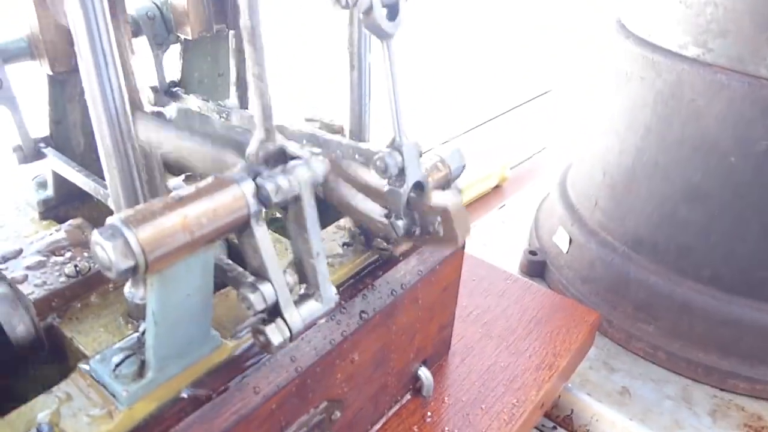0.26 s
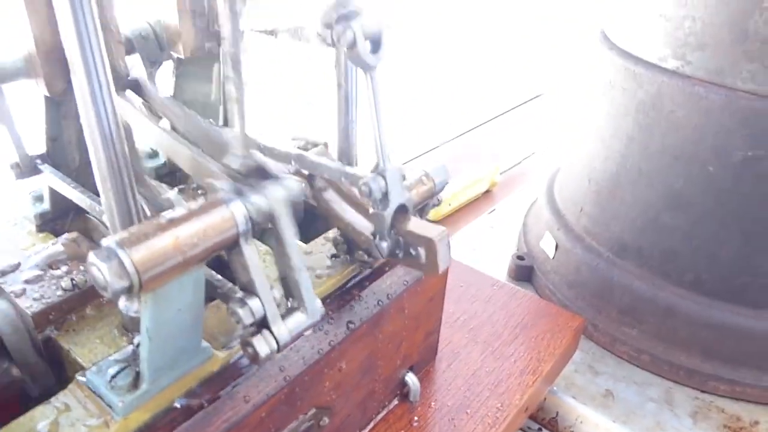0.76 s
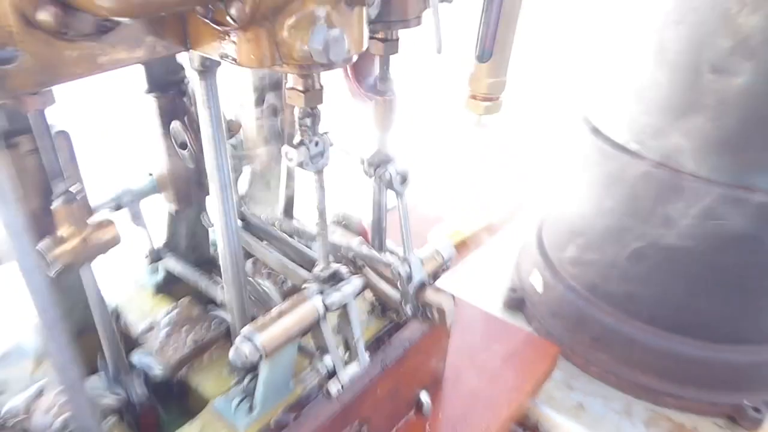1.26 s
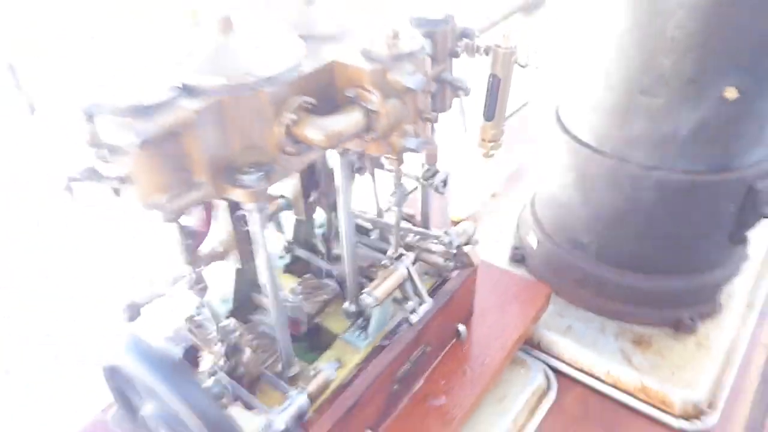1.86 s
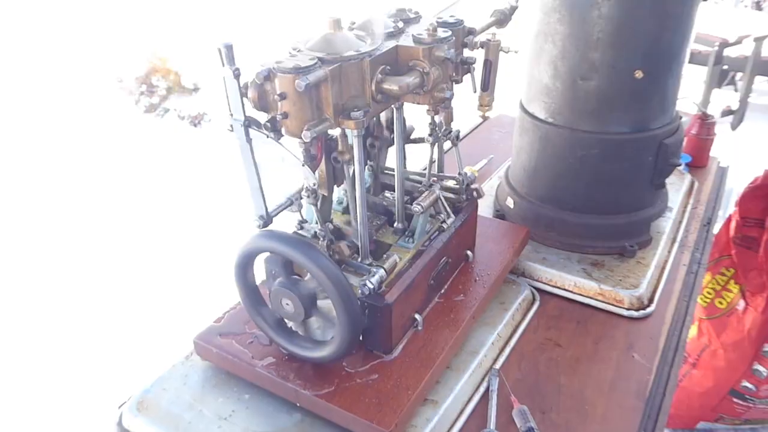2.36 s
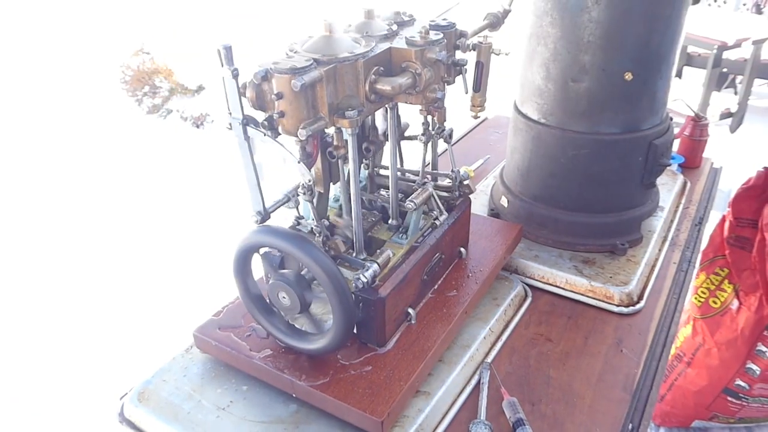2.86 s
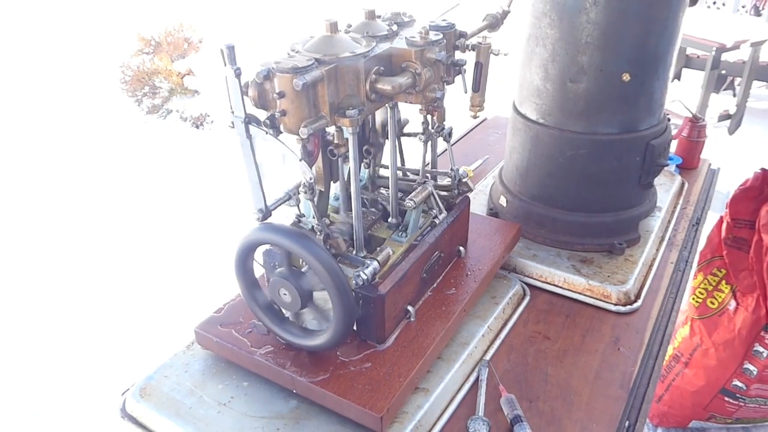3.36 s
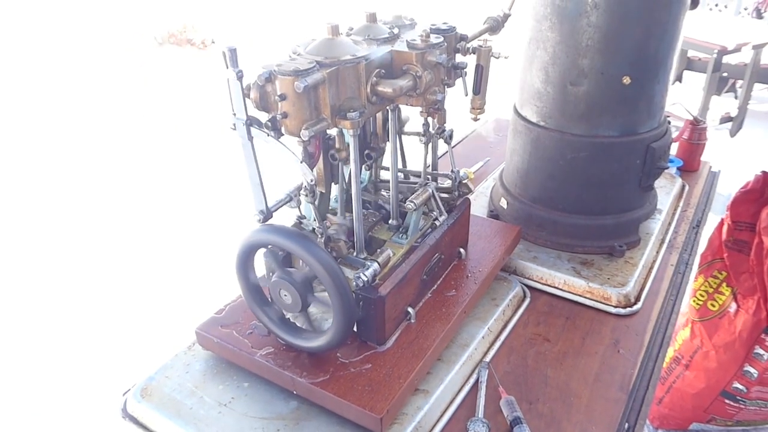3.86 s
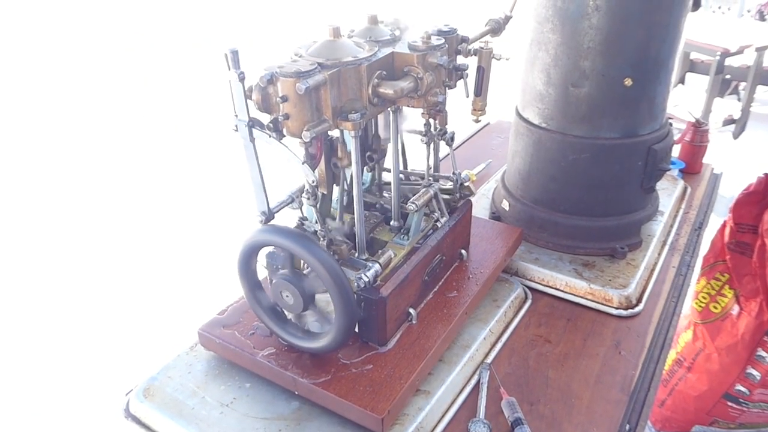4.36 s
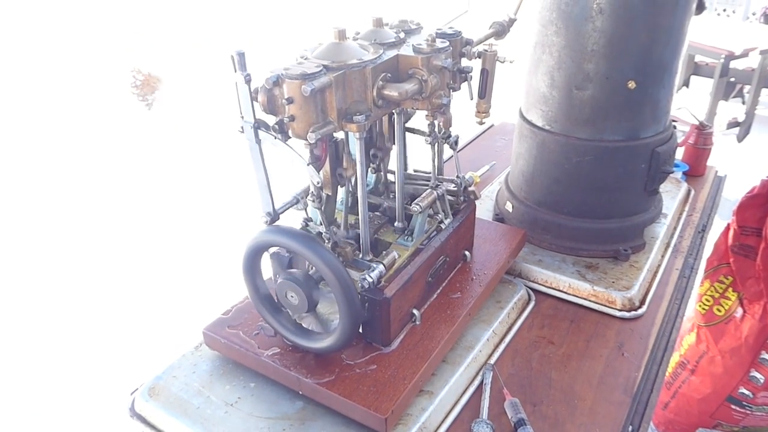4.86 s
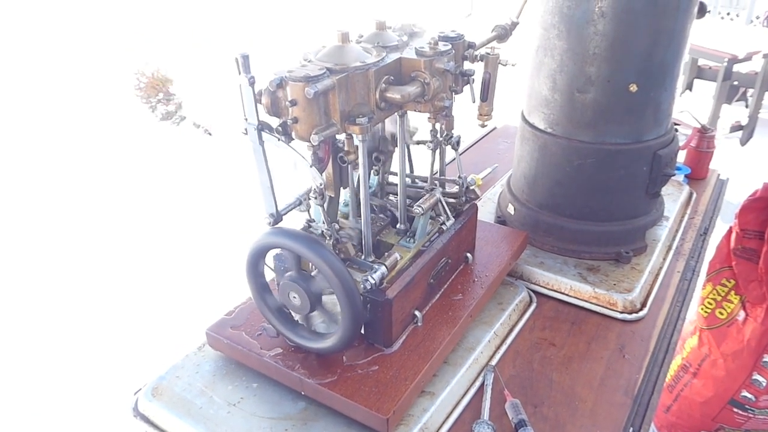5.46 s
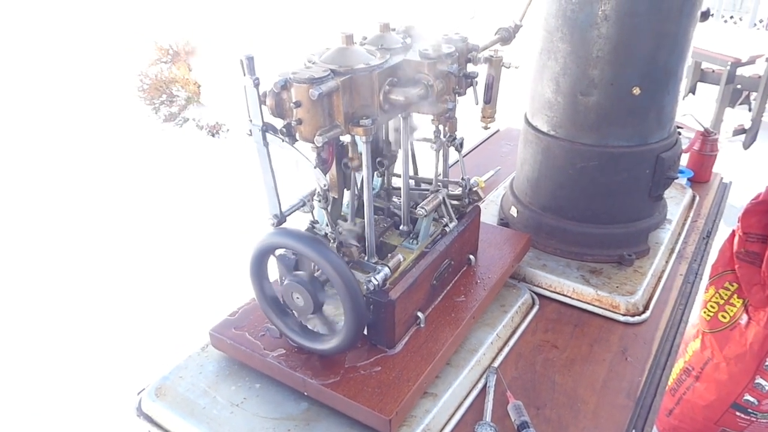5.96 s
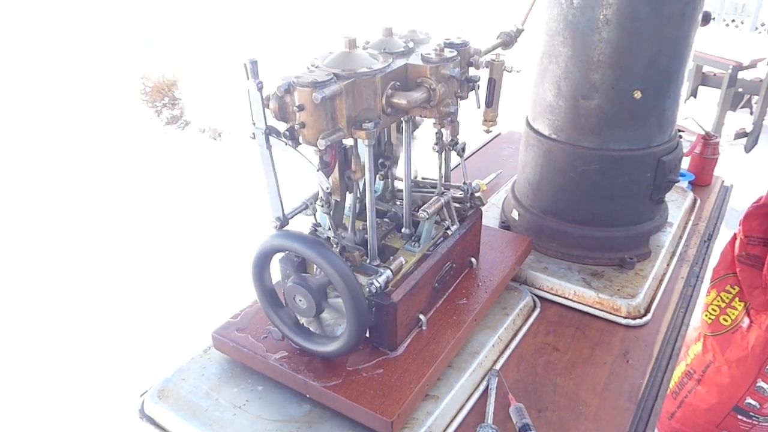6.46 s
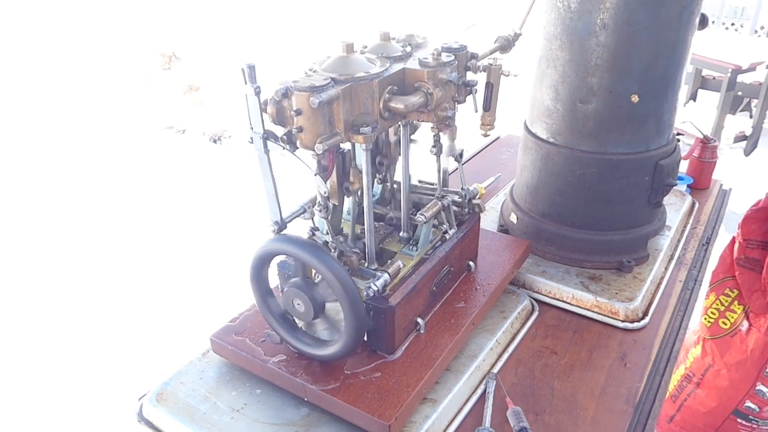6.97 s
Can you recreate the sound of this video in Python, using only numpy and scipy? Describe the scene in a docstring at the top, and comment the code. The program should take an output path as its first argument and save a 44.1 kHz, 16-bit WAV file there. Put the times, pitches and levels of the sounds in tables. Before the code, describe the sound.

Outdoors, a small steam engine is heard close up. A brief hiss and handling clicks lead in, then from about 0.2 s it chuffs rapidly, two unequal puffs per turn, nearly four turns a second. Each puff has a hollow pipe boom and a sharp breathy jet with faint whistling; between puffs come short metallic valve-gear clacks and soft bed thumps over steady leaking steam and low rumble. Left leans a little stronger in the midrange. Camera ticks and dull knocks increase from 1.9 s. At 2.4 s everything cuts to silence until about 2.66 s. The engine returns more distant, thinner and hissier, exhaust briefly weak, under dense crackling clicks until about 3.3 s, with a strong one near 2.96 s. Scattered ticks and knocks continue to 4.8 s, including a sharp one at 4.5 s. Afterwards the even chuffing continues almost undisturbed, somewhat stronger, to the end around 7.2 s.

```python
"""Small steam engine outdoors

A model steam engine gives two unequal exhaust chuffs a crank turn, with whistles, bed thumps and valve-gear clacks.
Steam leaks steadily. The hand-held camera backs away, its body ticks and knocks, and the sound drops out once.
Resonances colour noise for steam, rumble and gear; crank position times the strokes; clicks ring the body."""
import sys
import numpy as np
from scipy import signal
from scipy.io import wavfile
from scipy.ndimage import uniform_filter1d

SR = 44100
rng = np.random.default_rng(int(sys.argv[2]) if len(sys.argv) > 2 else 0)


def waveform_to_disk(signal):
    """Save audio, clipped to [-1, 1], as 16-bit WAV at the path in sys.argv[1]."""
    frames = np.transpose(np.atleast_2d(signal))
    scaled = np.clip(frames, -1, 1) * 32767
    samples = np.round(scaled).astype(np.int16)
    wavfile.write(sys.argv[1], SR, samples)


def field_ratio(decibels):
    """Amplitude ratio for a level in dB (20 dB per decade); scalars and array-likes work."""
    return 10 ** (np.asarray(decibels, dtype=float) / 20)


N = 317961

# crankshaft position, fastest early on, then settling a little slower: time_s, turns_made
CRANK = [(.18, 0), (.447, 1), (.588, 1.52), (0.732, 2), (1.697, 6), (2.185, 8), (3.199, 12), (3.707, 14),
         (4.249, 16), (5.031, 19), (6.094, 23), (7.145, 27), (7.41, 28)]
STEAM_REFERENCE_DB = -26    # exhaust level at which whistles, thumps and gear have their own levels


def rms_one(x):
    """Scale to rms 1."""
    return x / np.sqrt(np.mean(x ** 2) + 1e-20)


def in_time(rows):
    """Columns joined by straight lines, one value a sample."""
    s, *columns = np.transpose(rows)
    return [np.interp(np.arange(N) / SR, s, column) for column in columns]


def drift(rate_hz):
    """Slow chance of spread 1: white noise smoothed twice."""
    r = np.exp(-2 * np.pi * rate_hz / SR)
    return rms_one(signal.lfilter([1], [1, -2 * r, r * r], rng.standard_normal(N)))


def resonance(x, hz, width_hz):
    """Two-pole peak of gain 1."""
    r = np.exp(-np.pi * width_hz / SR)
    poles = [1, -2 * r * np.cos(2 * np.pi * hz / SR), r * r]
    return signal.lfilter(np.array([1, 0, -1]) * (1 - r * r) / 2, poles, x)


def coloured_noise(modes, near, alike, patchy_db, skirt):
    """Stereo noise in parallel resonances that follow the nearness and waver; half-second rms held at 1."""
    mid, side = rng.standard_normal((2, N))
    # alike is the correlation of left and right
    white = np.sqrt(1 + alike) * mid + np.sqrt(1 - alike) * side * [[1], [-1]]
    out = 0
    for k, (hz, width_hz, near_db, far_db) in enumerate(modes):
        # a wider second pass darkens the valleys
        peak = resonance(resonance(white, hz, width_hz), hz, skirt * width_hz)
        level_db = far_db + near * (near_db - far_db) + patchy_db * drift(13.9)
        out = out + (-1) ** k * field_ratio(level_db) * peak
    return out / np.sqrt(uniform_filter1d(np.mean(out ** 2, axis=0), size=SR // 2))


def steam_leak(leak_db, near):
    """Escaping steam hisses steadily, with small gusts in its level."""
    # hiss resonances: pitch_hz, width_hz, near_db, far_db (relative)
    leak_modes = [(2700, 1060, -8, -3), (5000, 3900, -5.5, -7.5), (6900, 1130, 7, 0.5),
                  (9100, 890, -6, 5.5), (10340, 700, 6, 5), (11530, 1400, -9.5, -3),
                  (13800, 1800, -48.5, -23)]
    gusts = field_ratio(leak_db + 1.6 * drift(12))
    return gusts * coloured_noise(leak_modes, near, alike=0.38, patchy_db=2.0, skirt=2.9)


def broad_rumble(ticks_per_s, near):
    """Wavering low and middle noise, louder while the camera ticks more, softer before the engine turns."""
    # rumble resonances: pitch_hz, width_hz, near_db, far_db (relative)
    rumble_modes = [(103, 54, -2.5, -6), (162, 66, -3, -0.5), (279, 136, 2, -2), (560, 220, 0, -3.5),
                    (930, 445, -3, -5.5), (1990, 2000, -14, -9.5)]
    idle = np.arange(N) / SR < CRANK[0][0]
    # -39 dB at 30 ticks per s, 3.5 dB more for ten times as many
    rumble_db = -39 + 3.5 * np.log10(np.maximum(ticks_per_s, 1) / 30) - 3 * idle
    shakes = field_ratio(rumble_db + 1.6 * drift(15))
    return shakes * coloured_noise(rumble_modes, near, alike=.92, patchy_db=3.5, skirt=3.7)


def handling_rumble(ticks_per_s):
    """Lumpy low noise, its own at each microphone, stronger the more the camera is handled."""
    lumps = field_ratio(-74 + 2.3 * np.array([drift(6.), drift(6.)])) * np.sqrt(np.maximum(ticks_per_s, 1))
    low_pass = signal.butter(2, 50., fs=SR, output="sos")
    return lumps * rms_one(signal.sosfilt(low_pass, rng.standard_normal((2, N))))


def ring(clicks, hz, t60):
    """A unit click sets a sine of height 1 ringing, 60 dB down after t60 seconds."""
    r, w = field_ratio(-60 / (t60 * SR)), 2 * np.pi * hz / SR
    return signal.lfilter([0, np.sin(w)], [1, -2 * r * np.cos(w), r * r], clicks + 1e-18)


def camera_ticks(ticks_per_s):
    """Each tick is a slip of a millisecond or two that reaches every body mode with its own strength and moment."""
    # clear ticks: time_s, level_db (relative), dull_against_bright_db
    ticks = [(0.148, -13, -2.5), (0.173, -8, -3), (0.1942, -1.5, -16.5), (0.262, -15.5, 1),
             (0.307, -14.5, 5), (0.3524, -12.5, -2), (0.3704, -7, 11.5), (0.7774, -13, -15),
             (1.0202, -13, -15), (1.1497, -10.5, -4), (1.4031, -10.5, 10), (1.5838, -12, -2),
             (1.6185, -7, 0), (1.911, -7, 4), (1.9506, -3, -1), (1.9925, -5, 3), (2.067, -10, 1.5),
             (2.072, -11, -16), (2.1484, -8, 5), (2.3034, -10, -2.5), (2.3219, -9.5, 10),
             (2.3384, -7.5, 6.5), (2.3477, -8, 5), (2.6729, -9.5, 0), (2.68, -6, -9.5), (2.6931, -5.5, 7.5),
             (2.6978, -1.5, 6), (2.7186, -11.5, -3.5), (2.7263, 0, -20), (2.7527, -9.5, -17),
             (2.8274, -0.5, -20), (2.8378, -4, 0), (2.854, 0.5, -15), (2.8802, -8.5, -7.5),
             (2.908, -11, -10), (2.921, -14, -11), (2.9528, -12, -12), (2.9618, 5.5, -18),
             (3.0054, -10, -7), (3.0488, -6, -4), (3.0595, -14, 7), (3.0741, -15, 4), (3.1211, -2, -5.5),
             (3.1443, -5, -6), (3.1538, -7.5, -5.5), (3.195, -11.5, 3.5), (3.2338, -6, -2),
             (3.2456, -11.5, -9), (3.2518, -9, -17), (3.418, -8, -1), (3.6297, -5.5, -4.5),
             (3.684, -9, -20), (3.7048, -8, -8), (3.8561, -5, 5), (3.8608, -6.5, 16), (4.0207, -3.5, -2),
             (4.132, -11.5, -5.5), (4.183, -6, -3), (4.202, -8.5, -20), (4.2204, -10, -3),
             (4.426, -14.5, -0.5), (4.5285, 2, -9), (4.6518, -16.5, 2), (4.7528, -11.5, -7.5),
             (4.7781, -16, -12), (5.3135, -13, -2.5)]
    # lower camera body modes: pitch_hz, level_db (relative), t60_s
    body_dull = [(934, -12, 0.013), (1730, -4.5, 0.0054), (2720, -1, 0.0034), (4037, -1, 0.003),
                 (4990, -3.5, 0.0029)]
    # upper camera body modes: pitch_hz, level_db (relative), t60_s
    body_bright = [(6400, -8, 0.0066), (7200, -5, 0.0037), (8910, 2.5, 0.0025), (9730, -16.5, 0.003),
                   (10490, -8.5, 0.0085), (12300, -17.5, 0.0036)]
    slip_s = .0008    # time constant of a tick's burst of micro-slips
    s, tick_db, dull_db = np.transpose(ticks)
    at, out = np.round(s * SR).astype(int), np.zeros((2, N))
    faint_db = -30.5 + 4.03 * np.minimum(rng.exponential(1, N), 3.2)
    faint = (rng.random(N) < ticks_per_s / SR) * field_ratio(faint_db)
    fade = np.exp(-np.arange(300) / (slip_s * SR))
    bright_share = 1 / (1 + field_ratio(dull_db) ** 2)
    for modes, share in ((body_dull, 1 - bright_share), (body_bright, bright_share)):
        for hz, level_db, t60 in modes:
            strength = faint.copy()
            strength[at] = field_ratio(tick_db - 3.0) * np.sqrt(share)
            where = np.flatnonzero(strength)
            strength *= field_ratio(level_db + 3.5 * rng.standard_normal(N)) * rng.choice([-1, 1], N)
            # scattered between the sides, leaning right
            sides = strength * field_ratio(0.36 * rng.standard_normal(N) * [[1], [-1]] + [[-.7], [.7]])
            late = where + (rng.exponential(.0002, N)[where] * SR).astype(int)
            clicks = np.zeros((2, N))
            clicks[:, np.minimum(late, N - 1)] = sides[:, where]
            slips = fade * rng.standard_normal(300) * (rng.random(300) < .15)
            slips = slips / np.sqrt(np.sum(slips ** 2))
            clicks = signal.fftconvolve(clicks, [slips], axes=1)[:, :N]
            out += ring(clicks, hz, t60)
    return signal.sosfilt(signal.butter(2, [500., 11500.], "band", fs=SR, output="sos"), out)


def camera_knocks():
    """A hand's soft contact rings the hollow body at its pitch and, weaker, at three overtones."""
    # dull knocks: time_s, level_db (relative), pitch_hz
    knocks = [(0.1945, -17, 510), (0.197, -21, 880), (0.913, -23.5, 448), (1.155, -22, 457),
              (1.948, -17.5, 408), (2.689, -24, 1110), (3.235, -24, 300), (3.977, -20.5, 843),
              (4.02, -20, 334), (4.181, -21, 785), (4.19, -23, 200)]
    out = np.zeros(N)
    for s, knock_db, hz in knocks:
        click = np.zeros(N)
        click[round(s * SR)] = field_ratio(knock_db)
        out += ring(click, hz, 0.058) + .9 * ring(click, 1.5 * hz, 0.038)
        out += 0.34 * ring(click, 2.2 * hz, 0.036) + 0.63 * ring(click, 2.9 * hz, 0.05)
    return signal.sosfilt(signal.butter(2, [220., 2500.], "band", fs=SR, output="sos"), out)


def every_turn(contacts, near):
    """Repeats the contacts of one turn: their times, the nearness then, and their other columns."""
    first_turn, last_turn = 1, 27
    turn = np.repeat(np.arange(first_turn, last_turn + 1), len(contacts))
    near_place, far_place, *columns = np.tile(np.transpose(contacts), last_turn + 1 - first_turn)
    crank_s, turns = np.transpose(CRANK)
    nearness = np.interp(np.interp(turn, turns, crank_s) * SR, np.arange(N), near)
    place = far_place + nearness * (near_place - far_place)
    return np.interp(turn + place, turns, crank_s), nearness, *columns


def swells(times, levels_db, rise_s, fall_s, rounded):
    """One rise and fall for every event; rounded 2 is a bell, 1 a sharp peak."""
    out, t = np.zeros(N), np.arange(-4000, 4000)
    shape = np.exp(-np.abs(t / SR / np.where(t < 0, rise_s, fall_s)) ** rounded)
    for s, level_db in zip(times, levels_db):
        at = round(s * SR) + t
        inside = (at >= 0) & (at < N)
        out[at[inside]] += field_ratio(level_db) * shape[inside]
    return out


def stroke_note(row, near, hz, width_hz, length_s):
    """Noise in one resonance that swells once a turn."""
    s, nearness, near_db, far_db = every_turn([row], near)
    level_db = far_db + nearness * (near_db - far_db) + 1.6 * rng.standard_normal(len(s))
    mid, side = rng.standard_normal((2, N))
    noise = mid + 0.26 * side * [[1], [-1]]
    tone = resonance(resonance(noise, hz, width_hz), hz, 2 * width_hz)
    return swells(s, level_db, rise_s=length_s, fall_s=length_s, rounded=1.8) * rms_one(tone)


def whistles_and_thumps(near):
    """Narrow notes in the steam, each stroke with its own, and the piston load thumping through the bed."""
    # steam notes: near_place_turns, far_place_turns, pitch_hz, near_db, far_db
    whistle_rows = [(-.17, -0.15, 7340, -39, -30.5), (-.17, -0.18, 2950, -36.5, -39.5),
                    (.25, .25, 2900, -39.5, -38.5), (.33, 0.34, 6760, -40.5, -31.5),
                    (.33, .34, 10300, -38, -29), (.33, .36, 9250, -40, -30)]
    # bed thumps: near_place_turns, far_place_turns, near_db, far_db
    thump_rows = [(-.19, -.18, -35.5, -39), (-.02, -0.058, -37, -38), (.5, .5, -37.5, -46)]
    sharpness = 22    # whistle pitch over width
    out = 0
    for near_place, far_place, hz, near_db, far_db in whistle_rows:
        row = (near_place, far_place, near_db, far_db)
        out = out + stroke_note(row, near, hz, hz / sharpness, length_s=0.028)
    for row in thump_rows:
        out = out + stroke_note(row, near, hz=170, width_hz=117, length_s=.012)
    return out


def exhaust(steam_db, near):
    """The port opens and shuts for each puff, which booms in the pipe and hisses at its mouth."""
    # chuffs: near_place_turns, far_place_turns, pipe_db (relative), near_jet_against_pipe_db, far_jet_against_pipe_db
    chuffs = [(-.155, -.135, -2.5, 7, 1.66), (.335, .355, 0.0, 7.5, 4.5)]
    # pipe resonances: pitch_hz, width_hz, near_db, far_db (relative)
    pipe_modes = [(148.2, 32, 1, -9.5), (194, 34, -5.5, -12), (290, 100, -11, -12), (439.5, 52, 4, -11),
                  (500, 62, 1, -4.5), (632, 37.5, -1.5, -1), (838, 150, 3, -3), (944, 83, -1, -1),
                  (1056, 69, 1.5, 3.5), (1281, 208, -5.5, -13), (1970, 540, -6, -12.5),
                  (2482, 110, -7.5, -9.5), (2903, 230, -3.5, -7)]
    # jet resonances: pitch_hz, width_hz, near_db, far_db (relative)
    jet_modes = [(3920, 1700, -15.5, -12), (5710, 360, -10.5, -6.5), (6714, 570, -1.5, -2),
                 (7030, 240, 8.5, -13), (7330, 230, -4.5, -1), (8580, 400, -23.5, -7),
                 (9190, 340, -13.5, 1.5), (10270, 500, -9, 0), (11360, 820, -19, -15),
                 (14300, 900, -39, -22)]
    s, nearness, pipe_db, jet_near_db, jet_far_db = every_turn(chuffs, near)
    scatter_db = 0.79 * rng.standard_normal((len(s), 2))
    pipe_db = pipe_db + np.interp(s * SR, np.arange(N), steam_db) + scatter_db[:, 0]
    jet_db = jet_far_db + nearness * (jet_near_db - jet_far_db) + scatter_db[:, 1]
    sputter = drift(100)    # wet steam leaves in uneven gulps
    pipe = swells(s, pipe_db + 1.0, rise_s=0.032, fall_s=0.034, rounded=2.44) * field_ratio(2.42 * drift(60))
    jet = swells(s, pipe_db + jet_db + .6, rise_s=0.033, fall_s=0.031, rounded=1.61) * field_ratio(1.44 * sputter)
    boom = pipe * coloured_noise(pipe_modes, near, alike=0.91, patchy_db=2.5, skirt=5.4)
    return boom + jet * coloured_noise(jet_modes, near, alike=0.81, patchy_db=2.5, skirt=3.9)


def valve_gear(near):
    """Gear taking up its slack: a short rattle of pins in their links with a thud through the bed."""
    # clacks: near_place_turns, far_place_turns, near_rattle_db, far_rattle_db, thud_against_rattle_db
    clacks = [(0.0, 0.0037, -19, -18, -12), (.525, .55, -23.5, -29, -1)]
    # rattle resonances: pitch_hz, width_hz, near_db, far_db (relative)
    rattle_modes = [(1717, 420, -7.5, -13), (2510, 500, 3, -2), (3450, 630, -4, -10), (4300, 530, -5, -11),
                    (5470, 290, 5.5, 1.5), (6780, 1000, -1.5, -11.5), (8920, 810, 0, 2),
                    (10540, 920, 1, -2.5), (13800, 1800, -24, -19.5)]
    # thud resonances: pitch_hz, width_hz, near_db, far_db (relative)
    thud_modes = [(190, 236, -5.5, -3.5), (466, 220, 1.5, -8.5), (786, 215, 1.5, 2.5),
                  (1470, 550, -18, -20)]
    s, nearness, near_db, far_db, thud_db = every_turn(clacks, near)
    scatter_db = 1.36 * rng.standard_normal((len(s), 2))
    rattle_db = far_db + nearness * (near_db - far_db)
    chatter = field_ratio(2.94 * drift(750))    # several touches within one clack
    rattle = swells(s, rattle_db + scatter_db[:, 0], rise_s=0.005, fall_s=0.0091, rounded=0.8) * chatter
    thud = swells(s, rattle_db + thud_db + scatter_db[:, 1], rise_s=0.0032, fall_s=0.0094, rounded=0.83)
    rattle = rattle * coloured_noise(rattle_modes, near, alike=0.78, patchy_db=1.2, skirt=9.0)
    return rattle + thud * coloured_noise(thud_modes, near, alike=0.93, patchy_db=0.4, skirt=3.1)


def scene():
    """Engine, leak and rumble, tilted to the left in the middle range, and the camera's own noises."""
    # steam: time_s, exhaust_db, leak_db
    steam = [(0, -26, -28.5), (.19, -26, -31), (.22, -26, -37.5), (.35, -29, -33), (.45, -28, -29),
             (.6, -25.5, -32), (1.8, -24.5, -32.5), (2.38, -26.5, -33.5), (2.8, -34.5, -31.5),
             (3.1, -28, -33.5), (3.8, -27.5, -34), (4.5, -29, -39), (5.6, -25, -36), (6.4, -27, -37.5),
             (7.21, -24, -33)]
    # camera: time_s, nearness (0-1), faint_ticks_per_s
    view = [(0, .8, 12), (1.0, 0.77, 40), (2.38, 0.65, 100), (2.67, 0.08, 320), (3.0, .1, 200),
            (3.6, 0.12, 90), (4.2, 0, 120), (4.8, 0, 15), (7.21, 0, 3)]
    steam_db, leak_db = in_time(steam)
    near, ticks_per_s = in_time(view)
    near = np.clip(near, 0, 1)
    steam_swing_db = steam_db - STEAM_REFERENCE_DB
    engine = steam_leak(leak_db, near) + broad_rumble(ticks_per_s, near)
    # whistles, thumps and gear follow part of the exhaust's swing
    engine = engine + field_ratio(.8 * steam_swing_db) * whistles_and_thumps(near)
    engine = engine + exhaust(steam_db, near) + field_ratio(.5 * steam_swing_db) * valve_gear(near)
    # from near, the sound reaches the left a little late: under one sample
    engine[0] = np.interp(np.arange(N) - near, np.arange(N), engine[0])
    middle = resonance(engine, hz=1600, width_hz=1460)    # the camera body shades the right microphone here
    top = resonance(engine, hz=9300, width_hz=2700)
    side = np.array([[1], [-1]])
    tilted = engine + side * ((0.22 + 0.56 * near) * middle - 0.09 * top)
    return tilted + handling_rumble(ticks_per_s) + camera_ticks(ticks_per_s) + camera_knocks()


def top_cut(x):
    """Nothing passes above the cut-off."""
    return signal.sosfilt(signal.butter(12, 15900, fs=SR, output="sos"), x)


def record(dry):
    """Bass and top cut, a limiter that ducks after sharp peaks, and the dropout."""
    # the silent gap: stop_s, start_s
    dropout = (2.3885, 2.664)
    x = signal.sosfilt(signal.butter(2, 110., "high", fs=SR, output="sos"), dry)
    x = signal.sosfilt(signal.butter(8, 15200., fs=SR, output="sos"), x)
    t = np.arange(N) / SR
    over_db = np.maximum(20 * np.log10(np.abs(x).max(axis=0) + 1e-9) + 7.4, 0)    # above -7.4 dB
    release = 360.0 * t    # dB regained per s
    duck_db = np.maximum(np.maximum.accumulate(over_db + release) - release, 0)
    lag = np.exp(-1 / (0.00056 * SR))    # the ducking sets in over 0.56 ms
    x = np.tanh(x * field_ratio(-signal.lfilter([1 - lag], [1, -lag], duck_db)))
    stop, start = dropout
    # out within 0.86 ms, back within 3.5 ms
    gate = np.clip(np.maximum((stop - t) / 0.00086, (t - start) / 0.0035), 0, 1) ** 2
    return top_cut(x * gate)


dry = scene()
out = record(dry)
waveform_to_disk(out)
```